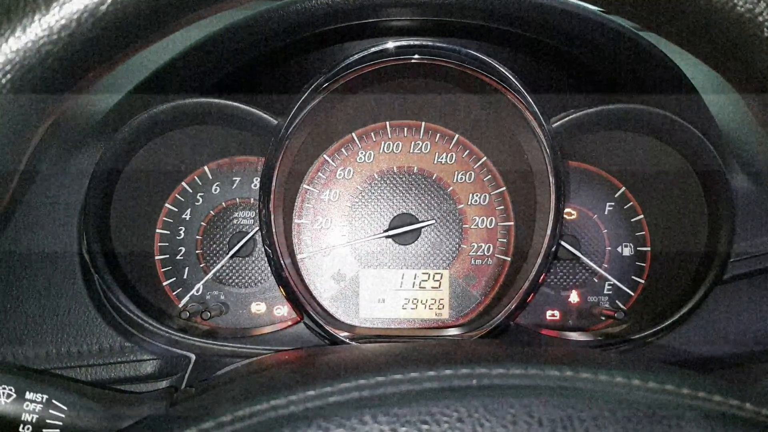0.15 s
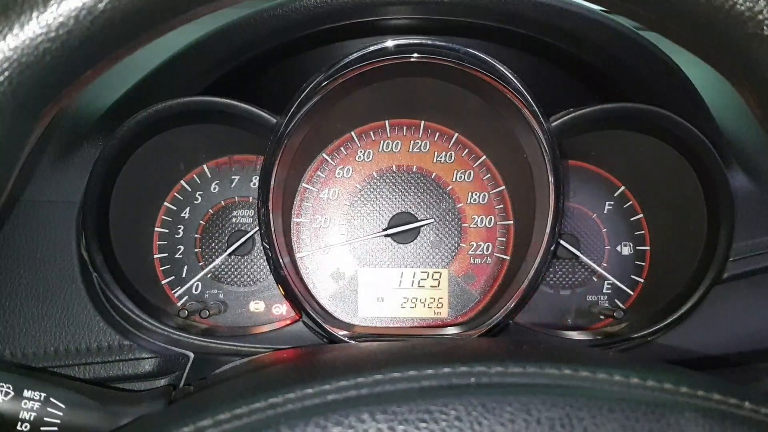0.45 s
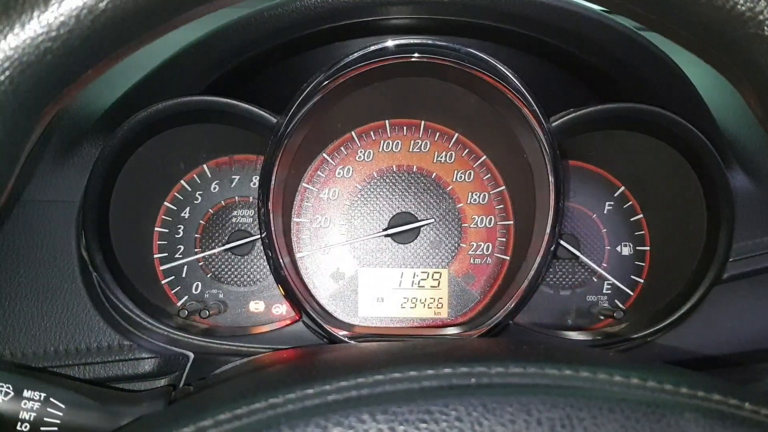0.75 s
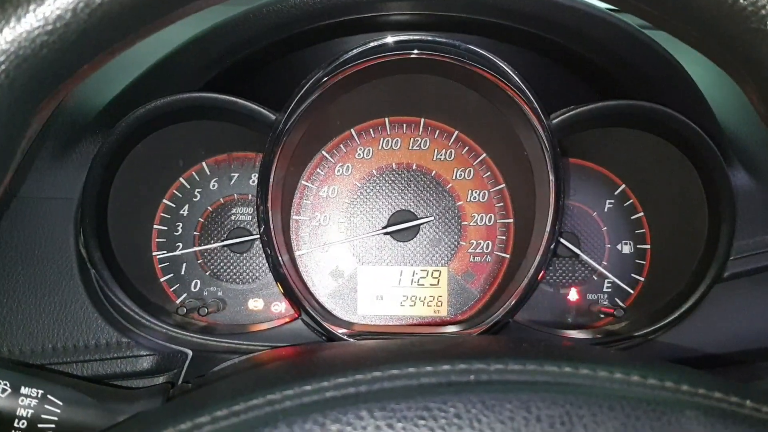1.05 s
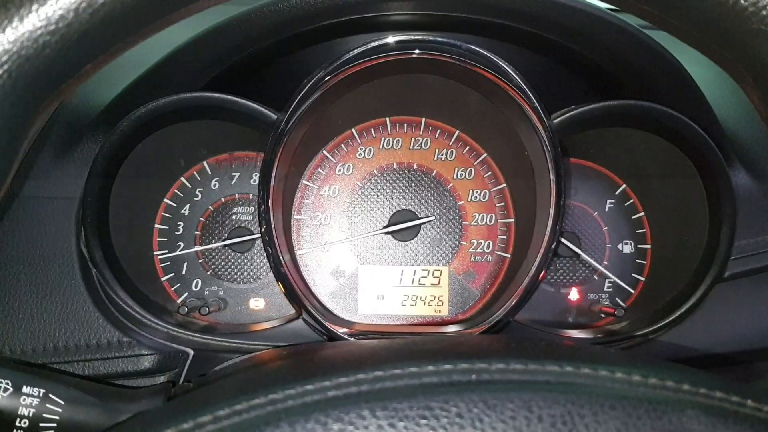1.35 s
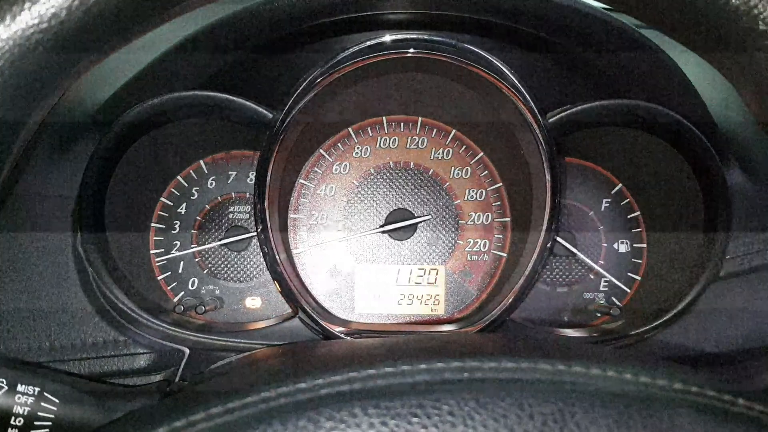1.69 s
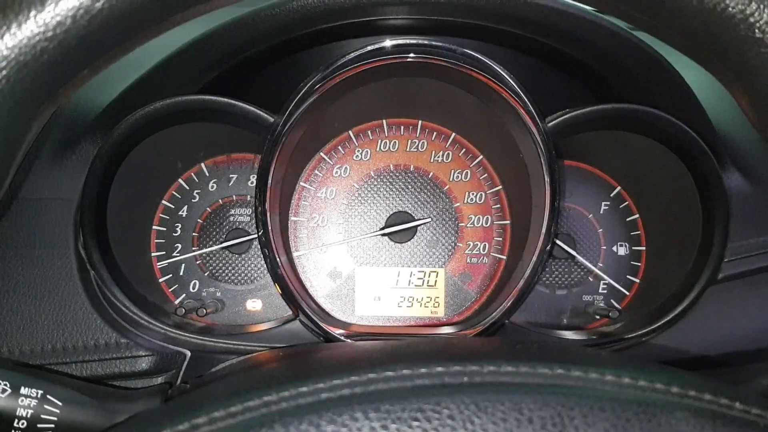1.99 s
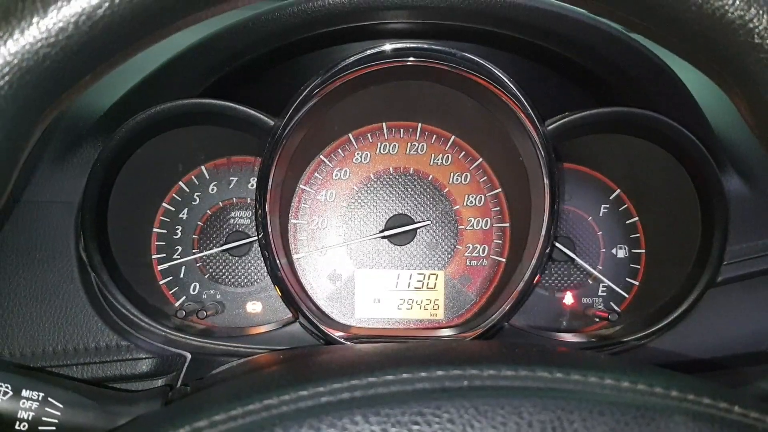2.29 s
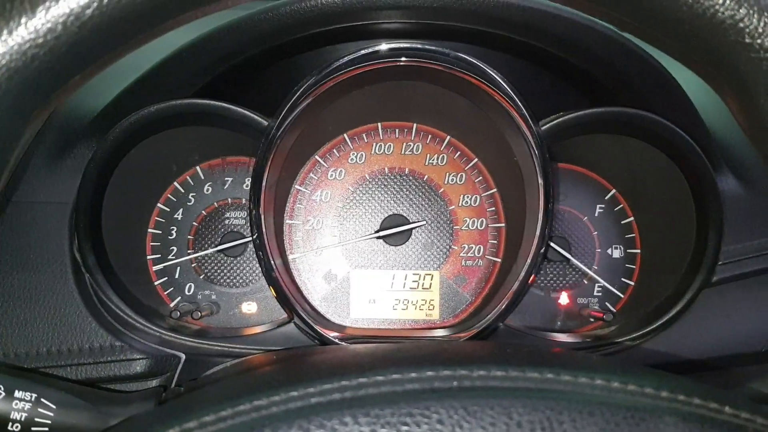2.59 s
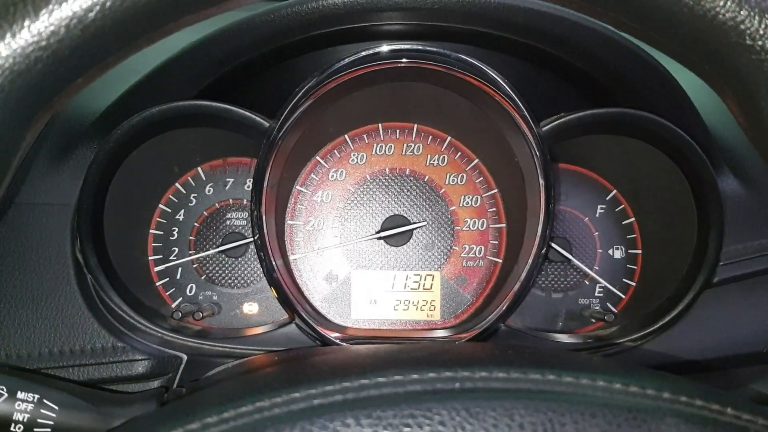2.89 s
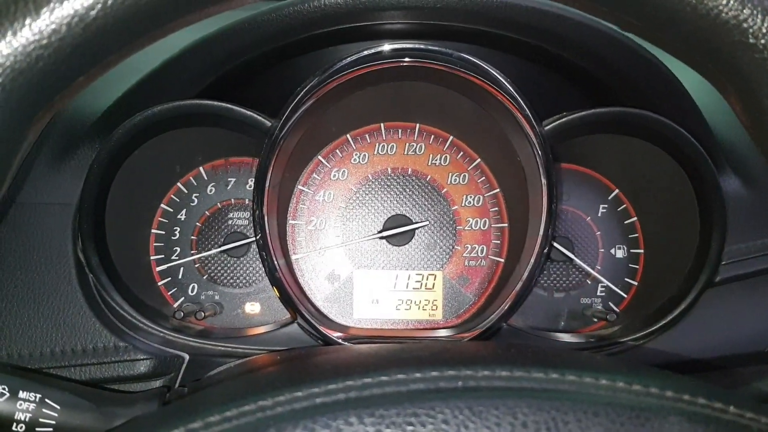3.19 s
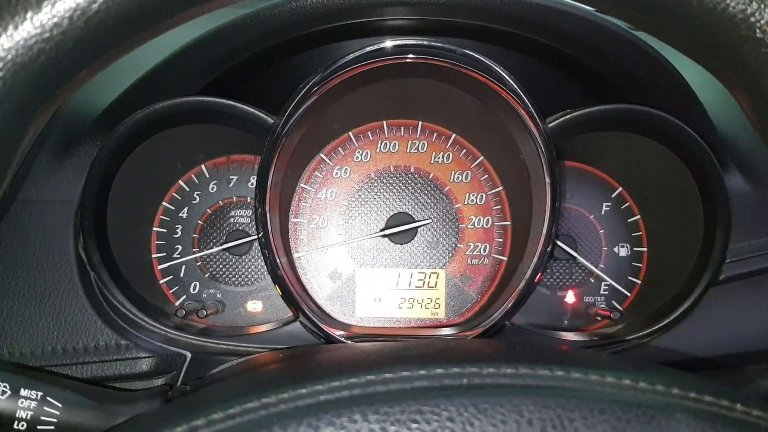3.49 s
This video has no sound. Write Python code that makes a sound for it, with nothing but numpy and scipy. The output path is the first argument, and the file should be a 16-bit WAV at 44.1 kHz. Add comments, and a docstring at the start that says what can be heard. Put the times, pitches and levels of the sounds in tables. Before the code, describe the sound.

Car engine start from the driver's seat: short rasping crank, booming flare, then low humming idle.

```python
"""A four-cylinder engine is started, heard from the driver's seat, inside the cabin.
First the starter labours over four compressions, rasping and shaking the body, with thumps and panel knocks.
The first firings thump hard and the engine catches; the key springs back and clicks, off to the right.
The speed flares and sags to a fast idle: summed firing orders boom where they cross the cabin's resonances.
A faint puff of treble hiss passes, and a hum of steady pitch fades in and beats against the second order."""
import sys
import numpy as np
from scipy import signal
from scipy.fft import rfft, irfft
from scipy.io import wavfile

SR = 44100
rng = np.random.default_rng(int(sys.argv[2]) if len(sys.argv) > 2 else 0)


def magnitude_from_level(level_db):
    """Linear magnitude for a level in decibels (20 dB per decade)."""
    exponent = np.asarray(level_db, float) / 20
    return 10 ** exponent


def to_wav(s):
    """Save 16-bit WAV."""
    ch = np.atleast_2d(s).T  # columns
    pcm = np.round(np.clip(ch, -1, 1) * 32767)  # PCM
    wavfile.write(sys.argv[1], SR, pcm.astype(np.int16))


N = 160965
T = np.arange(N) / SR
CATCH_S = 0.59   # the engine catches


def rms_one(x):
    """Scale to rms 1."""
    return x / np.sqrt(np.mean(x ** 2) + 1e-20)


def at_hz(points, hz):
    """Read a table on a log-frequency axis."""
    p = np.array(points, float)
    return np.interp(np.log(np.maximum(hz, 1)), np.log(np.maximum(p[:, 0], 1)), p[:, 1])


def drift(rate_hz):
    """Slow random wander of rms 1: noise through two equal low-pass poles, run at SR / 40."""
    pole = np.exp(-80 * np.pi * rate_hz / SR)
    draws = rng.standard_normal(N // 40 + 2002)
    slow = signal.lfilter([1], [1, -2 * pole, pole * pole], draws)[2000:]   # settled part
    return np.interp(np.arange(N) / 40, np.arange(len(slow)), rms_one(slow))


def noise(spectrum):
    """Coloured stereo noise, alike in the bass and loose in the treble; rms 1."""
    # likeness of the left and right ear [f/Hz, correlation]
    likeness = [(60, 0.99), (180, 0.85), (380, -0.094), (700, .3), (1300, -0.23), (4970, 0.088)]
    hz = np.fft.rfftfreq(N, 1 / SR)
    mid, side = rfft(rng.standard_normal((2, N))) * magnitude_from_level(at_hz(spectrum, hz))
    alike = np.clip(at_hz(likeness, hz), -1, 1)
    return rms_one(irfft(np.sqrt(1 + alike) * mid + np.sqrt(1 - alike) * side * [[1], [-1]], N))


def strike(times, db, modes, scatter_db, in_step=False):
    """Every blow sets each mode ringing, with a strength of its own, in step or with a chance sign."""
    out = np.zeros(N)
    luck = rng.standard_normal((len(times), len(modes), 2))
    at = (np.array(times) * SR).astype(int)
    for k, (hz, mode_db, t60) in enumerate(modes):
        sign = 1 if in_step else np.sign(luck[:, k, 1])
        blows = np.full(N, 1e-18)
        blows[at] = magnitude_from_level(db + mode_db + scatter_db * luck[:, k, 0]) * sign
        # two-pole resonator that falls 60 dB in t60 seconds
        r = magnitude_from_level(-60 / (t60 * SR))
        w = 2 * np.pi * hz / SR
        out += signal.lfilter([0, np.sin(w)], [1, -2 * r * np.cos(w), r * r], blows)
    return out


def starter():
    """Gear rasp and body shake leap up past each compression and sag as the next one builds."""
    # compressions passed [t/s, level/dB]
    compressions = [(-.02, -54), (0.172, -55), (0.306, -53.5), (0.432, -52.5)]
    # colour of the gear rasp [f/Hz, relative level/dB per Hz]
    rasp_colour = [(120, -27.5), (200, -3), (288, -7.5), (454, -2), (554, -18), (812, -14.5), (1780, -23.5),
                   (2380, -30), (3610, -23.5), (5490, -26.5), (6590, -32.5), (12900, -41.5), (15500, -53)]
    # colour of the body shake while cranking [f/Hz, relative level/dB per Hz]
    shake_colour = [(25, -27), (70, -6), (88, -4), (108, -17), (123, -8), (146, -11), (200, -30.5),
                    (260, -53), (340, -42), (570, -120)]
    rise_s, hold_s, sag_db_per_s = 0.012, 0.066, 93
    spin_db, off_s, coast_db_per_s = -53, 0.87, 53.5
    shake_db, shake_delay_s = 16, 0.013   # over the stroke level, behind the rasp
    swell_db, swell_s = -32.5, 0.071      # the shake grows as the engine begins to catch

    def strokes(delay_s, sag_share=1):
        """Level of the labouring motor: the loudest of its strokes at each moment."""
        levels = []
        for s, db in compressions:
            since = T - s - delay_s
            sag_db = sag_share * sag_db_per_s * np.maximum(since - hold_s, 0)
            levels.append(magnitude_from_level(db - sag_db) * np.clip(since / rise_s, 0, 1))
        return np.max(levels, axis=0)

    # steady spin from the fourth compression, coasting down once switched off
    spin = magnitude_from_level(spin_db - coast_db_per_s * np.maximum(T - off_s, 0))
    spin = spin * np.clip((T - compressions[3][0]) / 0.14, 0, 1)
    # the rasp's level is reckoned above 1 kHz
    high = signal.butter(2, 1000, "high", fs=SR, output="sos")
    rasp = noise(rasp_colour)
    rasp = rasp / np.std(signal.sosfilt(high, rasp))
    rasp = np.maximum(strokes(0), spin) * rasp * magnitude_from_level(1.25 * drift(70))

    swell = magnitude_from_level(swell_db) * np.exp(-((T - CATCH_S) / swell_s) ** 2)
    shake_level = magnitude_from_level(shake_db) * strokes(shake_delay_s, sag_share=0.4) + swell
    shake = shake_level * magnitude_from_level(0.5 * drift(36)) * noise(shake_colour)
    return rasp + shake


def thumps():
    """Jolts of the block on its mounts ring the body; smaller knocks ring its panels."""
    # jolts, light while cranking, hard at the first firings [t/s, level before trim/dB]
    jolts = [(.19, -40), (.335, -37), (.455, -37), (.535, -34), (.566, -30), (.583, -28), (.6, -30),
             (.619, -21), (.655, -24), (.688, -27), (.735, -30), (.765, -27)]
    # body modes [f/Hz, level/dB, t60/s]
    body_modes = [(52.4, -14.5, 0.1), (68.4, 2.5, 0.12), (88, 9.5, 0.14), (99, 3.5, 0.13), (136, 4, .09)]
    # knocks that reach the panels [t/s, level/dB]
    knocks = [(.03, -50), (.23, -47), (.325, -43), (.345, -44), (.452, -43), (.475, -42), (.585, -40),
              (.603, -38), (.63, -37), (.885, -41), (1.104, -41)]
    # panel modes [f/Hz, level/dB, t60/s]
    panel_modes = [(211, -8.5, 0.044), (279, -0.5, 0.13), (353, -0.5, 0.085), (467, 0, 0.078),
                   (773, -10.5, 0.072), (1094, -14, 0.018), (1900, -14, 0.03)]
    s, db = np.transpose(jolts)
    body = strike(s, db - 6.0, body_modes, scatter_db=2.0, in_step=True)
    soft = signal.sosfilt(signal.butter(2, 160, fs=SR, output="sos"), body)
    return soft + strike(*np.transpose(knocks), panel_modes, scatter_db=-0.5)


def cabin_db(hz):
    """Lift or dip that the cabin's resonances give a tone."""
    # cabin resonances [f/Hz, width/Hz, lift/dB]
    resonances = [(56.76, 6.7, 20.5), (111.5, 7.9, 5), (177, 26, 14.5), (196.4, 13.2, -6.5),
                  (248, 51.6, -9), (468, 43, 9.5), (536, 87, -6.5), (748.3, 50, 14), (890, 160, -11.5)]
    return sum(lift_db / (1 + (2 * (hz - at) / width_hz) ** 2) for at, width_hz, lift_db in resonances)


def engine():
    """Firing orders through the cabin, the hum, rumble and valve-gear hiss and ticks."""
    # crank speed [t/s, firing rate/Hz]
    speed = [(0.55, 25.4), (0.61, 34.3), (0.65, 40.6), (0.75, 53.1), (0.78, 55.3), (0.89, 62.4),
             (0.98, 64.6), (1.05, 65.4), (1.19, 63.5), (1.35, 60.7), (1.48, 58.6), (1.69, 55.3),
             (1.83, 53.8), (1.99, 52.74), (2.1, 52.3), (2.3, 51.97), (2.86, 51.78), (3.3, 51.46),
             (3.65, 51.1)]
    # engine load [t/s, load/dB, pull of the first order/dB, mechanical noise/dB]
    load = [(.55, -8, -5, -54), (.65, 0.5, -5, -68), (0.752, -2, -16, -59), (.87, 9, -2.5, -60),
            (.98, 2.5, 1.5, -59.5), (1.1, -2.5, 8.5, -59), (1.35, -2.5, 2.5, -61), (1.477, 3, 0, -60.5),
            (1.6, -4, -2.5, -60.5), (1.7, -0.5, 4, -62), (1.83, 0, -10.5, -63.5), (1.98, 0.5, 0.5, -63.5),
            (2.3, 0, -14.5, -64.5), (2.699, 0, -2.5, -64.5), (3.279, -0.5, -4, -64),
            (3.369, -3.5, -5.5, -66.5), (3.459, -1, -2.5, -64.5), (3.65, -0.5, 3.5, -65.5)]
    # orders before load and cabin [multiple of the firing rate, rms level/dB, wobble/dB]
    orders = [(1, -45.5, 3), (1.75, -53.5, 5.5), (2, -39, 0.65), (2.5, -59, 6), (3, -57, 1.84),
              (3.5, -66.5, 3.5), (4, -54.5, -3), (5, -61, 2), (6, -57, 0.5), (7, -63, 2), (8, -58.5, 5),
              (9, -58, -0.6), (13, -76.5, 1.5), (14, -70.5, -1), (15, -72.5, 3)]
    # colour of the rumble [f/Hz, relative level/dB per Hz]
    rumble_colour = [(25, -19.5), (53, -11.5), (86, -4), (109, -4.5), (149, -8.5), (214, -15), (253, -20.5),
                     (309, -15.5), (409, -18), (466, -17), (559, -29.5), (741, -26), (846, -30),
                     (1300, -46), (1690, -78)]
    # colour of the valve-gear hiss [f/Hz, relative level/dB per Hz]
    hiss_colour = [(590, -12), (1000, 1.5), (1110, -1), (1200, -10.5), (1520, -9.5), (2150, -9),
                   (2300, -4.5), (2480, -7), (2700, -11), (3460, -12), (3880, -8), (4600, -3.5),
                   (6470, -21), (15200, -31)]
    # head modes rung by the valve gear [f/Hz, level/dB, t60/s]
    head_modes = [(2380, -66, .025), (3960, -66, .04), (4550, -61, .012)]
    hum_hz, hum_db, hum_start_s, hum_fade_s = 97.85, -39.5, 1.38, 1.46   # level before load
    beat_top_s = 2.735   # hum and second order are in step here
    idle_hz, roar_db_per_hz, whine_db_per_hz = 52.24, 0.6264, -1.04
    whine_start_s, catch_rise_s = 1.0, 0.04
    rumble_db, rumble_follows, hiss_db = -44.5, 1.164, 2.5   # hiss over the mechanical noise

    rate_hz = np.interp(T, *np.transpose(speed))
    s, *columns = np.transpose(load)
    load_db, pull_db, noise_db = [np.interp(T, s, column) for column in columns]
    turns = np.cumsum(rate_hz) / SR   # firings so far

    hum_turns = hum_hz * (T - beat_top_s) + 2 * turns[int(beat_top_s * SR)]
    hum_level = magnitude_from_level(hum_db + load_db + 0.81 * drift(7.6)) * np.clip((T - hum_start_s) / hum_fade_s, 0, 1)
    tones = np.sqrt(2) * hum_level * np.sin(2 * np.pi * hum_turns)

    above_idle_hz = (rate_hz - idle_hz).clip(0)
    for k, db, wobble_db in orders:
        wander = 0.019 * wobble_db ** 2 * drift(3.88)   # phase, in cycles
        level_db = db + load_db + pull_db * (k == 1) + cabin_db(k * rate_hz) + wobble_db * drift(17.5)
        # above idle, orders 3, 5 and 7 swell; the sixth and the high ones sink
        tilt = roar_db_per_hz * (k in (3, 5, 7)) + whine_db_per_hz * (k == 6 or k >= 8)
        level_db = level_db + above_idle_hz * tilt
        if k >= 8:   # the high orders climb 40 dB per second up to the whine's start
            level_db = level_db - 40 * (whine_start_s - T).clip(0)
        tones = tones + np.sqrt(2) * magnitude_from_level(level_db) * np.sin(2 * np.pi * (k * turns + wander))

    noise_change_db = noise_db - noise_db[-1]
    rumble_level = magnitude_from_level(rumble_db + rumble_follows * noise_change_db + 0.81 * drift(6.0))
    rumble = rumble_level * noise(rumble_colour)
    hiss = magnitude_from_level(noise_db + hiss_db + 0.93 * drift(11.0)) * noise(hiss_colour)
    # the valve gear ticks twice per firing, opposite in sign at the two ears
    at = np.flatnonzero(np.diff(np.floor(2 * turns)))
    ticks = strike(at / SR, noise_change_db[at], head_modes, scatter_db=-3.5, in_step=True) * [[1], [-1]]
    return (tones + rumble + hiss + ticks) * np.clip((T - CATCH_S) / catch_rise_s, 0, 1)


def key():
    """The key rubs back through the lock in grains and ends in bright metal clicks, to the right."""
    # rubs of the key turning back [start t/s, length/s, level before grain/dB]
    rubs = [(0.809, 0.025, -46.5), (0.824, 0.038, -42.5), (0.842, 0.041, -42), (0.876, 0.055, -50.5)]
    # colour of the rubbing [f/Hz, relative level/dB per Hz]
    rub_colour = [(350, -45), (600, -6), (953, -2), (3920, -13.5), (4750, -12), (5360, -17), (12600, -22),
                  (15500, -41)]
    # metal clicks [t/s, level before trim and pan/dB]
    clicks = [(.8785, -45), (.8815, -41), (.8845, -26), (.8872, -30), (.8895, -33), (.893, -35),
              (.8965, -38), (.904, -48)]
    # ringing of the key [f/Hz, level/dB, t60/s]
    key_modes = [(10750, -5, 0.01), (11400, -7.5, 0.018), (12630, -7, .018), (13100, 2.5, 0.014),
                 (13600, -3.5, 0.018), (14700, -10, .016)]
    # colour of the dry crack in each click [f/Hz, relative level/dB per Hz]
    crack_colour = [(880, -45), (1500, -10), (4480, -13), (7020, -19), (7600, -13), (10800, -15),
                    (12900, 2), (15500, -18)]
    grains_per_s, crack_db, crack_t60_s = 1500, -6, 0.015
    pan_db = -9   # left minus right, clicks only

    rub_level = 0
    for s, length_s, db in rubs:
        fade_in = np.clip((T - s) / 0.0086, 0, 1)
        fade_out = np.clip((s + length_s - T) / 0.015, 0, 1)
        rub_level = rub_level + magnitude_from_level(db) * fade_in * fade_out
    # chance grains of uneven strength, each with a short decay
    grains = (rng.random(N) < grains_per_s / SR) * magnitude_from_level(4.0 * rng.exponential(1, N))
    grains = signal.lfilter([1], [1, -0.965], grains)
    rub = rub_level * (0.62 + rms_one(grains) * 0.47) * noise(rub_colour)

    crack_level = 0
    for s, db in clicks:
        decay_db = 60 * np.maximum(T - s, 0) / crack_t60_s
        crack_level = crack_level + magnitude_from_level(db + crack_db - decay_db) * (T >= s)
    crack = crack_level * noise(crack_colour)
    s, db = np.transpose(clicks)
    # drawn apart for the left and right ear
    rings = np.array([strike(s, db - 11.0, key_modes, scatter_db=2.5) for _ in range(2)])
    return rub + (rings + crack) * magnitude_from_level(np.array([[0.5], [-0.5]]) * pan_db)


def puff():
    """A faint short swell of treble hiss: high-passed noise under a bell-shaped level."""
    at_s, length_s, low_hz, puff_db = 1.725, 0.045, 6500, -70
    high = signal.butter(2, low_hz, "high", fs=SR, output="sos")
    air = signal.sosfilt(high, rng.standard_normal((2, N)))
    return magnitude_from_level(puff_db) * np.exp(-((T - at_s) / length_s) ** 2) * air


def scene():
    """All sources; the cabin leans each frequency of all but the key to one ear."""
    # lean of the cabin [f/Hz, left minus right level/dB]
    cabin_lean = [(60, -6), (110, -4.5), (200, -7.5), (380, 2.5), (700, 0), (1290, -5.5), (2380, -4),
                  (4400, 2), (8120, -3)]
    car = rfft(starter() + thumps() + engine() + puff())
    lean_db = at_hz(cabin_lean, np.fft.rfftfreq(N, 1 / SR)) * [[0.5], [-0.5]]
    return irfft(car * magnitude_from_level(lean_db), N) + key()


def low_pass(x):
    """Removes everything above the highest recorded frequency."""
    return signal.sosfilt(signal.butter(12, 15710, fs=SR, output="sos"), x)


def record(dry):
    """The microphone at the driver's seat loses the deepest bass and the top."""
    low_cut_hz, top_hz = 36, 15650
    heard = signal.sosfilt(signal.butter(4, low_cut_hz, "high", fs=SR, output="sos"), dry)
    heard = signal.sosfilt(signal.ellip(10, 0.5, 60, top_hz, fs=SR, output="sos"), heard)
    return low_pass(heard)


dry = scene()
out = record(dry)
to_wav(out)
```